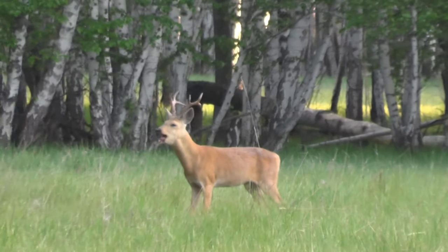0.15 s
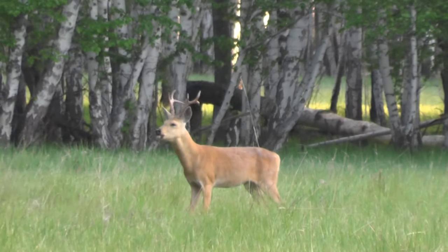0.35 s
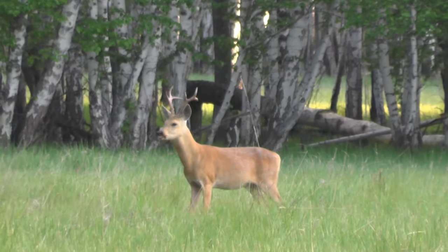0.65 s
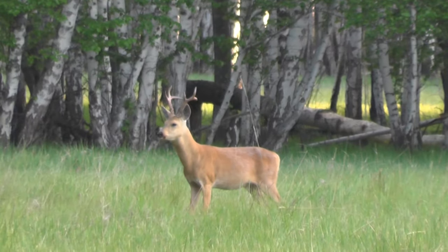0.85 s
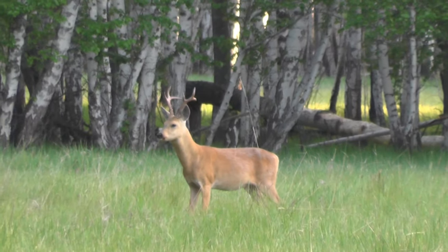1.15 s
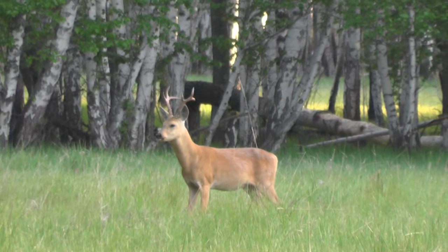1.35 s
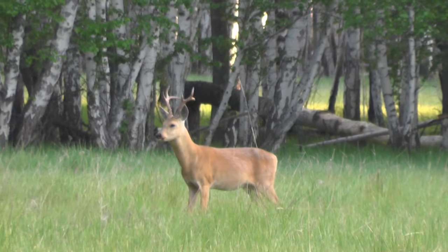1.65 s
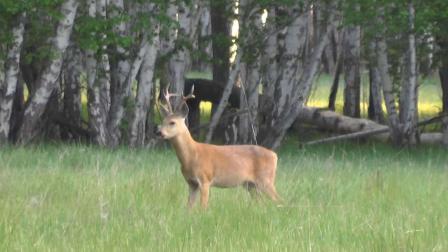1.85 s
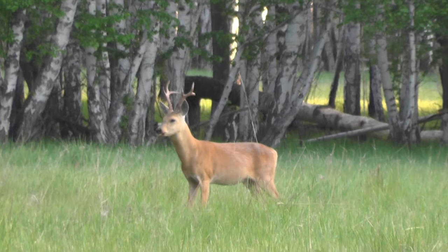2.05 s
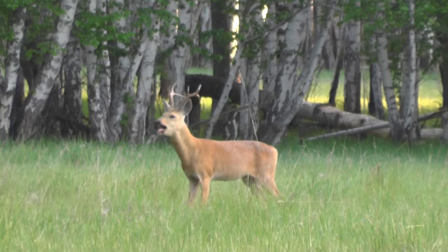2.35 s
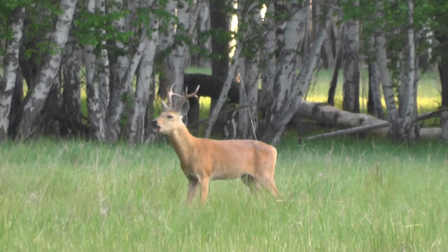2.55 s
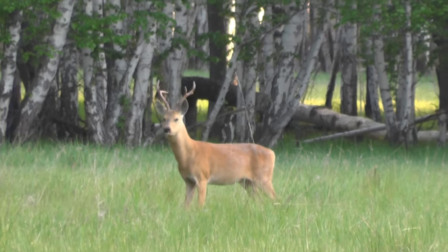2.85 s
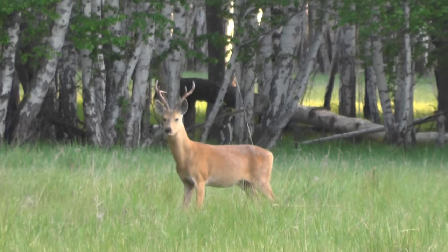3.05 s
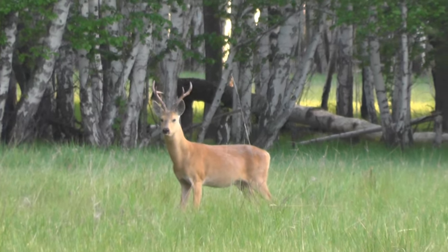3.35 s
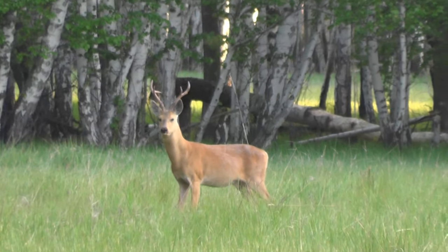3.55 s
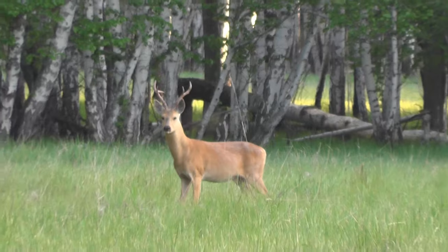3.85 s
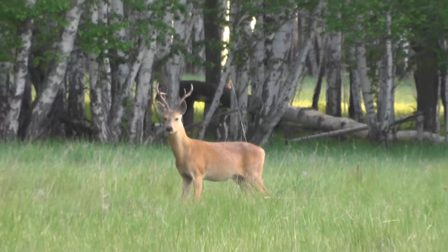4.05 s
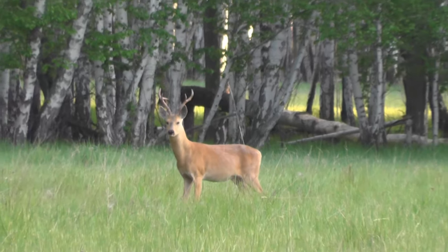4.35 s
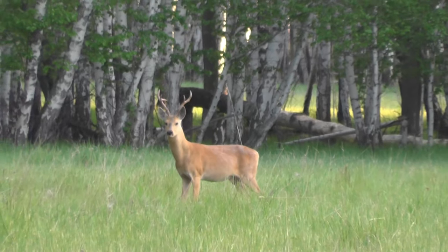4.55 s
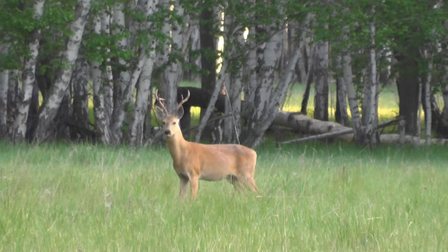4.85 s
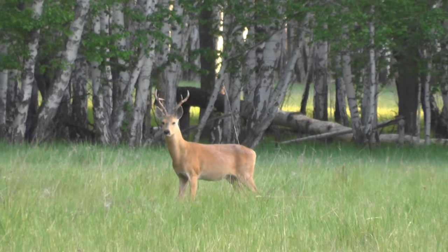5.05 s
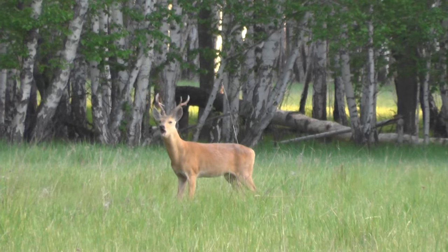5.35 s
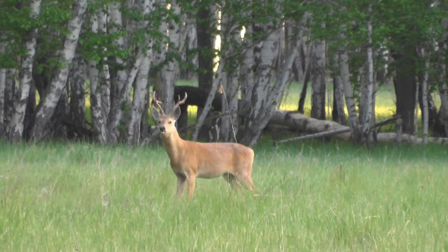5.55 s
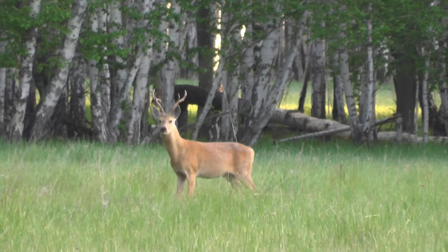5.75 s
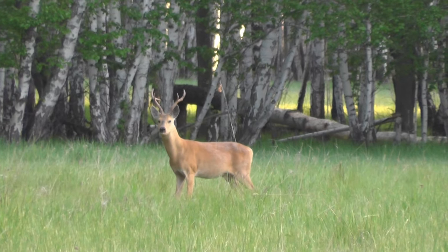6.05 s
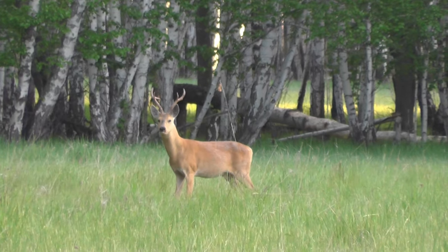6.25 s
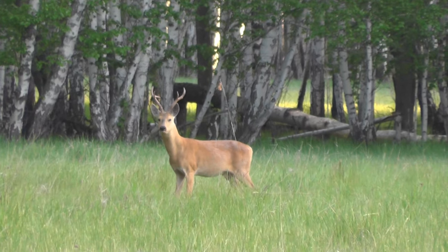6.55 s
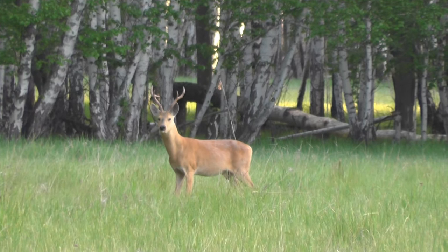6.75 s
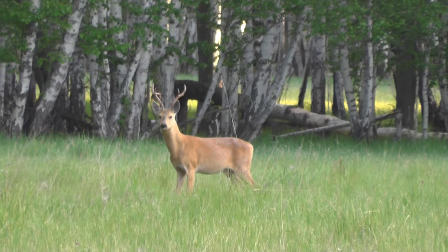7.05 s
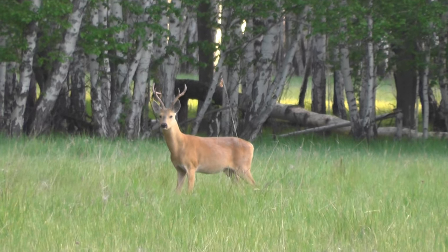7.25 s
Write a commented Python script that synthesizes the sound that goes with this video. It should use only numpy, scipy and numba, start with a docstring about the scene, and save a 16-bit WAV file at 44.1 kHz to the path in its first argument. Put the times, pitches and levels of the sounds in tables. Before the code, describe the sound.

A deer barks hoarsely three times in a meadow, each bark echoing through the nearby wood, with faint birdsong between.

```python
"""A meadow opens on a faint bird note and a sharp snap close by. At 0.3 s a deer barks: chaotic pulses of
its vocal folds excite the resonances of a moving mouth. The edge of a wood reflects the bark, then the
trunks far inside reverberate for seconds. A songbird follows with three motifs and a run of arched chirps.
The deer barks again at 2.7 s and 5.5 s, among scattered bird notes and faint snaps. To the end there
remain the low rush of the meadow and the hiss and whine of a camera."""
import sys
import numpy as np
from scipy import signal
from scipy.fft import rfft, irfft, next_fast_len
from scipy.io import wavfile
from scipy.ndimage import uniform_filter1d, map_coordinates
from numba import njit

SR = 44100
rng = np.random.default_rng(int(sys.argv[2]) if len(sys.argv) > 2 else 0)


def digitize_waveform(pressure):
    """Quantize a signal to 16-bit integers and store it at the path in sys.argv[1].

    Rows of a 2-D input are taken as channels; values are limited to [-1, 1].
    """
    field = np.atleast_2d(pressure).T
    bounded = np.clip(field, -1, 1)
    quanta = np.round(bounded * 32767).astype(np.int16)
    wavfile.write(sys.argv[1], SR, quanta)


N = 326340

# barks; chest and rasp are relative to effort, the two formants are those of the open mouth:
# start_s, attack_s, held_s, effort_db, chest_db, rasp_db, first_hz, second_hz
DEER_BARKS = [(.305, 0.0437, .17, -27, -8, -16.5, 588, 1213),
              (2.674, 0.0145, 0.1806, -28, -9, -17, 610, 1179),
              (5.482, 0.01575, .17, -29, -5.5, -15.5, 606, 1238)]
# spectrum of the upper throat: frequency_hz, gain_db
RASP_SPECTRUM = [(1200, -47), (1700, -26), (2050, -7), (2300, 3.5), (2500, 2.5), (2850, 7), (3300, 1),
                 (3700, -8), (4450, -10), (5200, -20), (6200, -21.5), (8000, -38), (12000, -82)]
# reflection off the wood's edge: frequency_hz, gain_db
EDGE_SPECTRUM = [(200, -30), (600, -0.5), (900, -14), (1150, -24), (1450, 5.5), (1900, -3), (2800, -18),
                 (6000, -3)]
# reverberation among the nearest trunks: frequency_hz, t60_s
NEAR_TRUNK_DECAY = [(300, 3.1), (600, 1.6), (1300, 0.73), (3000, 0.491), (7000, 0.44)]
# reverberation of the deep wood: frequency_hz, t60_s
DEEP_WOOD_DECAY = [(300, 5.8), (600, 4.36), (1300, 4.46), (3000, 0.69), (7000, 0.93)]
# colour of the deep wood: frequency_hz, gain_db
DEEP_WOOD_SPECTRUM = [(200, 20.5), (600, 1), (950, -2), (1300, -12.5), (2500, 5), (6000, 7.5)]
# the near bird's motifs, each a pip, a sagging buzz and a flick:
# start_s, level_db, pip_hz, buzz_length_s, buzz_low_hz, flick_after_s, flick_top_hz
BIRD_MOTIFS = [(0.634, -53, 3900, .034, 3050, .079, 5050), (0.815, -53.5, 3742, 0.072, 2916, 0.086, 4680),
               (0.997, -53, 3770, .064, 2820, .087, 4680)]
# its arched chirps, a clear rise and a buzzed fall: top_time_s, top_hz, foot_hz, level_db
BIRD_ARCHES = [(1.207, 3295, 2370, -55), (1.328, 3363, 2300, -55.5), (1.445, 3340, 2129, -55.5),
               (1.561, 3430, 2000, -57.5), (1.677, 3210, 2020, -55.5)]
# single notes of birds near and far:
# start_s, length_s, from_hz, turn_hz, to_hz, turn_share, level_db, change_db, buzz_depth_hz, echo_db
BIRD_NOTES = [(.125, 0.05, 3930, 3900, 3575, 0.33, -60, -4, 200, 2),
              (.285, .025, 4060, 4330, 4476, 0.56, -60, -7.5, 60, 0),
              (1.772, 0.021, 5000, 5030, 4880, .7, -58, 6.5, 63, -6.5),
              (1.85, .045, 4008, 3500, 2290, 0.39, -50.5, 8, 60, -2),
              (1.965, 0.1, 2640, 3885, 4240, .34, -56.5, -5, 139, -3.5),
              (3.022, 0.036, 5060, 4300, 3760, 0.414, -60.5, 0, 121.2, -2.5),
              (3.053, .026, 3080, 2930, 2860, 0.46, -55, -2, 40, -6),
              (3.14, 0.229, 3200, 3447, 3405, 0.79, -63.5, -9, 230, 2.5),
              (3.42, .12, 4800, 4680, 4750, 0.25, -69, -8.5, 180, -1),
              (3.6, 0.046, 2631, 2930, 3020, .5, -52, -2.5, 24, -1),
              (3.8, 0.0565, 2700, 2930, 2960, 0.34, -52, -6, 30, -3),
              (4.21, 0.059, 3955, 4240, 3630, 0.496, -56.5, 1.5, 40, -2),
              (4.26, 0.072, 3025, 3527, 3390, 0.455, -64, -0.5, 180, -3),
              (4.32, .04, 2720, 3134, 2760, .5, -57.5, -3, 33, -2),
              (5.23, .03, 4600, 4150, 3600, .4, -70, -2.5, 40, -11.5),
              (5.385, .035, 4710, 4080, 3514, 0.587, -66, -6, 36.9, -3),
              (5.915, 0.024, 4850, 4500, 4100, .5, -67, 0, 37.05, -9),
              (6.17, 0.142, 3370, 3480, 3485, 0.49, -76, 1.5, 60, -6),
              (6.2, .025, 4700, 4350, 4000, .5, -80, 0, 37, -7),
              (6.47, 0.15, 3260, 3534, 3520, .5, -74.5, 3.5, 55, -11),
              (6.88, 0.084, 3595, 3640, 3600, .5, -69, -1, 73.06, -3),
              (6.99, 0.031, 3390, 3100, 2860, .5, -70.5, 0, 40, -6),
              (7.2, 0.18, 3420, 3500, 3600, 0.38, -75, 1.5, 67, -4.5)]
# snaps: start_s, level_db, crackle_length_s, treble_limit_hz
SNAP_EVENTS = [(0.2211, -8.5, 0.0016, 20000), (1.516, -48, 0.0011, 5000), (1.637, -48, 0.00073, 5000),
               (1.759, -40, 0.00105, 5870), (4.553, -54, .001, 5500), (7.358, -45.5, 0.00233, 5500)]
# spectrum of the crackle: frequency_hz, gain_db
CRACKLE_SPECTRUM = [(180, -64), (300, -9), (1200, -4), (4070, 4), (4720, 6.5), (7250, -3.5), (9140, 4),
                    (14300, -15), (15500, -22)]
# modes of the plastic: frequency_hz, level_db, t60_s
PLASTIC_MODES = [(450, -37, 0.095), (1267, -23, 0.047), (1730, -19, 0.028), (4600, -41, 0.11),
                 (7140, -21.5, 0.063), (8100, -44, 0.012)]
# meadow and far rumble: frequency_hz, density_db
MEADOW_SPECTRUM = [(15, -46), (25, -17.5), (220, -6.5), (319, -7), (351, -5.5), (385, -5.5), (879, -11),
                   (1000, -11.5), (2200, -22), (2860, -27.5), (4840, -120)]
# camera hiss: frequency_hz, density_db
HISS_SPECTRUM = [(1060, -41), (1800, -37), (2080, -21), (2710, -1), (2910, -11), (3590, -12), (5070, -11),
                 (7570, -19.5), (11000, -11), (15800, -11.5)]
# narrow bands of the camera's whine: centre_hz, width_hz, gain_db
WHINE_BANDS = [(1660, 177, -1), (2690, 130, 1.5), (3357, 230, -2), (5162, 510, -3.5), (5960, 190, -4)]
# left-right likeness of the background: frequency_hz, correlation
NOISE_CORRELATION = [(60, 0.2), (250, -0.35), (550, 0.32), (1400, 0.754), (2500, 0.999), (6000, 1),
                     (8000, 0.846), (10000, 1)]

ONSET_DB, DROOP_DB = -17, -2.5  # effort at the start of a bark and at the end of its hold
RELEASE_S, RELEASE_DB = 0.0649, -11.5
OPENING_S, SHUT_FIRST, SHUT_SECOND = .03, 0.776, 0.9667  # formant ratios, shut mouth over open
CLOSING_LEAD_S, CLOSING_S, CLOSED_FIRST, CLOSED_SECOND = 0.033, 0.076, 0.91, 0.823  # the lips draw in
RASP_SURGE_DB, SURGES_PER_S = 2.5, 35
PIP_S, BUZZ_GAP_S, FLICK_S, FLICK_FOOT_HZ = .023, .004, .028, 3690
ARCH_RISE_S, ARCH_FALL_S, NEAR_ECHO_DB = 0.025, .034, -6.5
TOP_HZ = 15750


def deer(edge_delay_s=.13):
    """Multipath propagation: each bark arrives directly, off the wood's edge and scattered by trunks."""
    out = np.zeros((2, N))
    for start_s, *settings in DEER_BARKS:
        start = round(start_s * SR)
        voice, rumble = bark(*articulation(*settings))
        add(out, start, voice * pan(.5))
        edge = echoes(coloured(voice, EDGE_SPECTRUM), [(1000, 0.13)], 1.0, length_s=.2, rise_s=0.00093)
        add(out, start + round(edge_delay_s * SR), amp(-7) * edge)
        add(out, start, amp(-7) * echoes(voice, NEAR_TRUNK_DECAY, 0.92, length_s=1.5, rise_s=0.008))
        far = coloured(voice, DEEP_WOOD_SPECTRUM)
        deep_wood = echoes(far, DEEP_WOOD_DECAY, 0.983, length_s=6.2, rise_s=0.063)
        add(out, start, amp(-10) * deep_wood * pan(-.2))
        scattered = echoes(rumble, [(60, 0.76), (200, 0.35)], .1, length_s=1, rise_s=0.042)
        add(out, start, amp(-32.5) * scattered)
    return out


def bark(effort_db, chest_db, rasp_db, first_hz, second_hz,
         pitch_hz=132, sag=.12, drift=.02, jitter=.04, breath=1.3):
    """Source and filter: the vocal folds slap unevenly, each slap freeing a puff that the mouth colours."""
    n = len(effort_db)
    falling = -sag * np.linspace(0, 1, n) ** 2  # the pitch sags as the breath runs out
    cycles = np.cumsum(pitch_hz * np.exp(falling + drift * wobble(n, 20) + jitter * wobble(n, 119.82)) / SR)
    strength = amp(1.9 * rng.standard_normal(int(cycles[-1]) + 2))[cycles.astype(int)]
    slaps = np.diff(np.floor(cycles), prepend=0) * strength
    puffs = strength * np.exp(-1.2 * (cycles % 1)) * rng.standard_normal(n)
    folds = unit(slaps) + breath * unit(puffs)
    chest = cavity(folds, first_hz, 86) - 0.85 * cavity(folds, 1.364 * first_hz, 264)
    chest += 0.14 * cavity(folds, 0.841 * first_hz, 140)
    # the nose splits the second formant
    mouth = cavity(folds, 1.047 * second_hz, 162) - 0.45 * cavity(folds, 0.9146 * second_hz, 119)
    mouth -= 0.5 * cavity(folds, 1.276 * second_hz, 456)
    rasp = unit(coloured(0.19 * unit(slaps) + unit(puffs), RASP_SPECTRUM))
    rumble = cavity(puffs, np.full(n, 105.), 165.5)
    voice = steady(unit(mouth), 1.0) + amp(chest_db) * steady(unit(chest), 0.59)
    voice += amp(rasp_db + RASP_SURGE_DB * wobble(n, SURGES_PER_S)) * rasp
    t = np.arange(n) / SR
    envelope = amp(effort_db) * np.minimum(1, np.minimum(t / 0.0015, t[::-1] / 0.034))
    return envelope * voice, envelope * rumble


def articulation(attack_s, held_s, effort_db, chest_db, rasp_db, first_hz, second_hz):
    """Formants follow the aperture: they rise as the mouth opens and fall as the lips draw in."""
    release_at_s = attack_s + held_s
    t = np.arange(round((release_at_s + RELEASE_S) * SR)) / SR
    release = np.clip((t - release_at_s) / RELEASE_S, 0, 1)
    shut = np.exp(-t / OPENING_S)
    closed = np.clip((t - release_at_s + CLOSING_LEAD_S) / CLOSING_S, 0, 1)
    contour_db = np.interp(t, [0, attack_s, release_at_s], [ONSET_DB, 0, DROOP_DB]) + RELEASE_DB * release
    # a shut mouth weakens both bands; in the release the chest lingers and the rasp fades
    return (effort_db + contour_db,
            chest_db - 7 * shut + 9.5 * release,
            rasp_db - 7 * shut - 12 * release,
            first_hz * SHUT_FIRST ** shut * CLOSED_FIRST ** closed,
            second_hz * SHUT_SECOND ** shut * CLOSED_SECOND ** closed)


def cavity(x, hz, width_hz):
    """Two equal resonators in cascade give a formant with steep flanks."""
    angle, radius = 2 * np.pi * hz / SR, np.exp(-np.pi * width_hz / SR)
    return unit(resonate(resonate(x, angle, radius), angle, radius))


@njit
def resonate(x, angle, radius):
    """A driven, damped oscillator whose centre (angle, radians a sample) may move."""
    y = np.zeros(len(x))
    for i in range(2, len(x)):
        y[i] = x[i] - x[i - 2] + 2 * radius * np.cos(angle[i]) * y[i - 1] - radius * radius * y[i - 2]
    return y


def steady(x, firmness, window_s=0.021):
    """Amplitude regulation: lung pressure holds the voice, partly evening out chance swells."""
    return unit(x / (uniform_filter1d(np.abs(x), round(window_s * SR)) + .05) ** firmness)


def echoes(x, decay, correlation, length_s, rise_s):
    """Diffuse reverberation: reflections build up, then each frequency decays at its own rate."""
    hz, t, field = signal.stft(rng.standard_normal((2, round(length_s * SR))), SR, nperseg=256)
    field = field * amp(-60 * t / along(decay, hz)[:, None]) * (1 - np.exp(-t / rise_s))
    mid, side = signal.istft(field, SR, nperseg=256)[1]
    angle = np.arccos(correlation) / 2
    response = np.cos(angle) * mid + np.sin(angle) * side * np.array([[1], [-1]])
    return signal.fftconvolve(x[None], response / np.linalg.norm(mid), axes=1)


def birds(trill_hz=170):
    """Frequency and amplitude modulation turn gliding whistles into buzzes; the trees blur them."""
    out = np.zeros((2, N))
    for start_s, length_s, *pitch_path, level_db, change_db, buzz_depth_hz, echo_db in bird_notes():
        start, n = round(start_s * SR), round(length_s * SR)
        hz = glide(n, *pitch_path)
        depth_hz = buzz_depth_hz * np.clip(1 - np.gradient(hz) * SR / 15000, 0, 1)  # steep rises stay clear
        trill = np.sin(2 * np.pi * np.cumsum(trill_hz + 8 * wobble(n, 32)) / SR)
        phase = 2 * np.pi * np.cumsum(hz * (1 + 0.01 * wobble(n, 151.4)) + depth_hz * trill) / SR
        db = level_db + change_db * np.linspace(-.5, .5, n)
        db -= 10 * np.log10(1 + amp(2 * echo_db))  # note and echo share the power
        db += depth_hz / 65 + 2 * trill * (depth_hz > 90)  # deep buzzes are louder and pulse
        db += 1.8 * wobble(n, 116)
        note = np.sqrt(2) * amp(db) * signal.windows.tukey(n, .35) * np.sin(phase)
        add(out, start, note * pan(.3))
        add(out, start, amp(echo_db) * echoes(note, [(3000, 1.0)], 0.994, length_s=.5, rise_s=0.0022))
    return out


def bird_notes():
    """Song as a sequence of glides: single notes, motifs and arches in the columns of BIRD_NOTES."""
    notes = list(BIRD_NOTES)
    for start_s, db, pip_hz, buzz_s, low_hz, after_s, top_hz in BIRD_MOTIFS:
        flick_at_s = start_s + after_s
        pip = (start_s, PIP_S, 0.94 * pip_hz, pip_hz, 0.94 * pip_hz, .7, db, 0, 60)
        buzz_at_s = flick_at_s - BUZZ_GAP_S - buzz_s
        buzz = (buzz_at_s, buzz_s, 1.12 * low_hz, low_hz, 1.05 * low_hz, .6, db - 1.5, 0, 200)
        flick = (flick_at_s, FLICK_S, FLICK_FOOT_HZ, top_hz, FLICK_FOOT_HZ, 0.36, db - 4, 0, 150)
        notes += [(*note, NEAR_ECHO_DB) for note in (pip, buzz, flick)]
    arch_s = ARCH_RISE_S + ARCH_FALL_S
    for top_time_s, top_hz, foot_hz, db in BIRD_ARCHES:
        pitch_path = (foot_hz, top_hz, foot_hz, ARCH_RISE_S / arch_s)
        notes.append((top_time_s - ARCH_RISE_S, arch_s, *pitch_path, db, -14, 230, NEAR_ECHO_DB))
    return notes


def glide(n, from_hz, turn_hz, to_hz, turn_share, bend=1.3):
    """Two power-law sweeps, to the turn and from it; each starts fast and eases off."""
    progress = np.arange(n) / n
    first = 1 - np.clip(progress / turn_share, 0, 1)
    second = 1 - np.clip((progress - turn_share) / (1 - turn_share), 0, 1)
    return turn_hz + (from_hz - turn_hz) * first ** bend + (to_hz - turn_hz) * (1 - second ** bend)


def snaps():
    """Impulse and free vibration: a short crackle slightly to the left, then damped modes of plastic."""
    out, t = np.zeros((2, N)), np.arange(SR // 10) / SR
    ring = sum(amp(db - 60 * t / t60_s) * np.sin(2 * np.pi * hz * t) for hz, db, t60_s in PLASTIC_MODES)
    for start_s, level_db, length_s, limit_hz in SNAP_EVENTS:
        common, *sides = rng.standard_normal((3, len(t)))
        envelope = np.minimum(1, amp(-60 * (t - length_s) / 0.015)) * (1 - np.exp(-t / 0.00028))
        burst = envelope * (common + 0.19 * np.array(sides))
        crackle = filtered(burst, lambda hz: amp(along(CRACKLE_SPECTRUM, hz)) / (1 + (hz / limit_hz) ** 6))
        add(out, round(start_s * SR), amp(level_db) * (crackle / np.abs(crackle).max() + ring) * pan(.8))
    return out


def meadow():
    """Ambient noise: the meadow and a far rumble, with most power at low frequencies."""
    return amp(-60) * rush(lambda hz: amp(along(MEADOW_SPECTRUM, hz)), patchy_db=1.05) * pan(-.4)


def camera_noise():
    """Self-noise: a broadband hiss and a whine of narrow noise bands."""
    hiss = amp(-59) * rush(lambda hz: amp(along(HISS_SPECTRUM, hz)), patchy_db=.5)
    whine = amp(-66) * rush(lambda hz: whine_response(hz) ** 2, patchy_db=3.5)
    return (hiss + whine) * pan(.3)


def whine_response(hz):
    """Modal superposition: second-order resonances summed with alternating sign."""
    return sum((-1) ** k * amp(db) * 1j * hz * width / (centre ** 2 - hz ** 2 + 1j * hz * width)
               for k, (centre, width, db) in enumerate(WHINE_BANDS))


def rush(gain, patchy_db):
    """Partly coherent stereo noise of rms 1, its level varying in patches of time and frequency."""
    spectra = signal.stft(rng.standard_normal((2, N)), nperseg=512)[2]
    patches = uniform_filter1d(rng.standard_normal(spectra.shape[1:]), size=6, axis=0)
    patches = uniform_filter1d(patches, size=14, axis=1)
    pair = signal.istft(spectra * amp(patchy_db * unit(patches)), nperseg=512)[1][:, :N]
    angle = lambda hz: np.arccos(along(NOISE_CORRELATION, hz)) / 2
    mid, side = filtered(pair, lambda hz: gain(hz) * [np.cos(angle(hz)), np.sin(angle(hz))])
    return unit(np.array([mid + side, mid - side]))


def amp(db):
    """Decibels as an amplitude ratio."""
    return 10 ** (np.asarray(db) / 20)


def pan(left_db):
    """Level difference: the left gains what the right loses."""
    return amp([[left_db], [-left_db]])


def unit(x):
    """Normalisation to rms 1."""
    return x / np.sqrt(np.mean(x ** 2) + 1e-20)


def along(points, hz):
    """Interpolation of (frequency_hz, value) points on a log axis."""
    knots_hz, values = np.transpose(points)
    return np.interp(np.log(hz + 1), np.log(knots_hz + 1), values)


def wobble(n, rate):
    """Smooth random modulation, rate knots a second."""
    return map_coordinates(rng.standard_normal(int(n * rate / SR) + 4), [np.arange(n) * rate / SR])


def filtered(x, response):
    """Linear filtering: the spectrum of x times a complex response."""
    size = next_fast_len(x.shape[-1] + 8192)
    return irfft(rfft(x, size) * response(np.fft.rfftfreq(size, 1 / SR)), size)[..., :x.shape[-1]]


def coloured(x, spectrum):
    """Zero-phase filtering by (frequency_hz, gain_db) points."""
    return filtered(x, lambda hz: amp(along(spectrum, hz)))


def add(track, start, x):
    """Superposition of x on the track from a sample on."""
    track[:, start:start + x.shape[1]] += x[:, :N - start]


def scene():
    """Superposition: the pressures of all sources add."""
    background = meadow() + camera_noise()
    return deer() + birds() + snaps() + background


def record(dry):
    """Band limiting: an ideal low-pass keeps nothing above TOP_HZ."""
    return filtered(dry, lambda hz: hz < TOP_HZ)


dry = scene()
out = record(dry)
digitize_waveform(out)
```